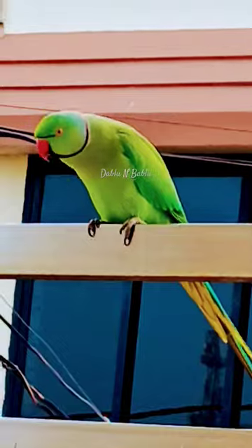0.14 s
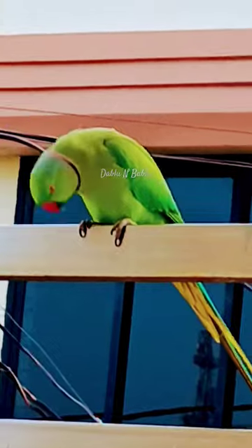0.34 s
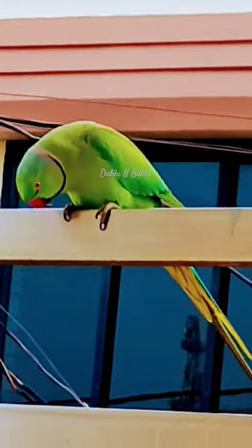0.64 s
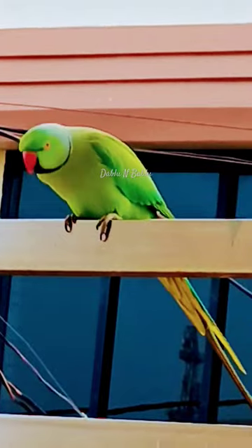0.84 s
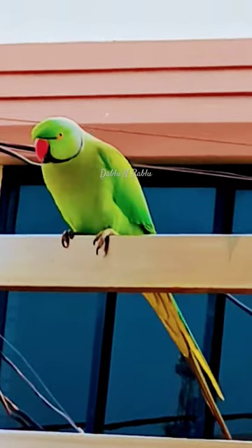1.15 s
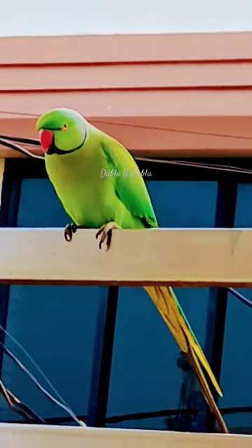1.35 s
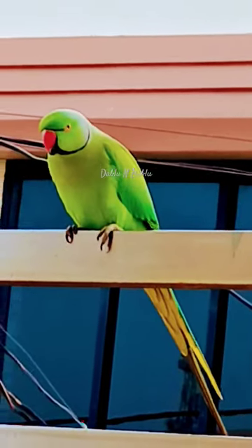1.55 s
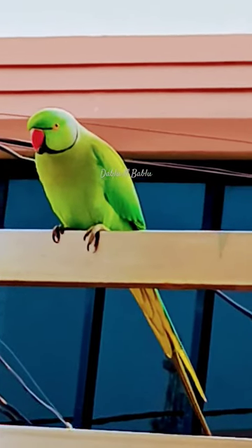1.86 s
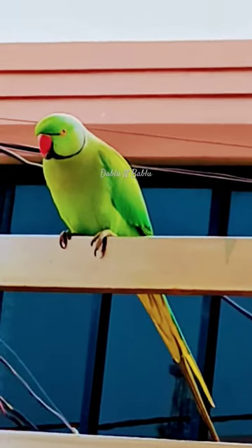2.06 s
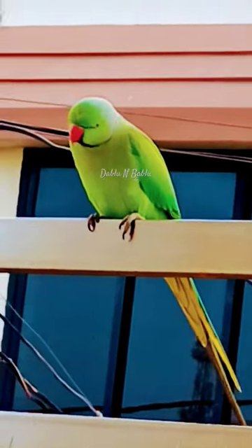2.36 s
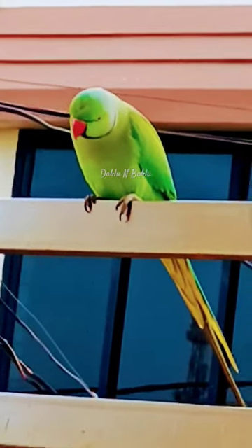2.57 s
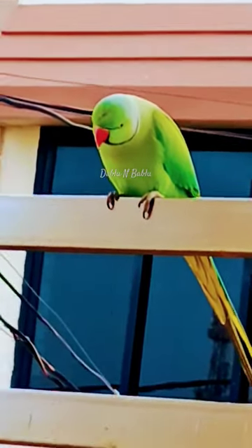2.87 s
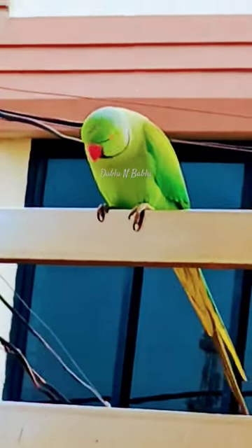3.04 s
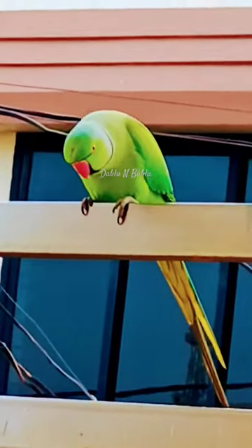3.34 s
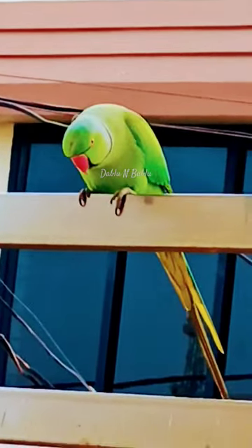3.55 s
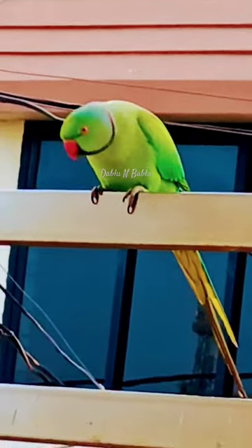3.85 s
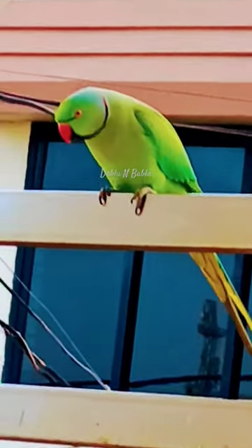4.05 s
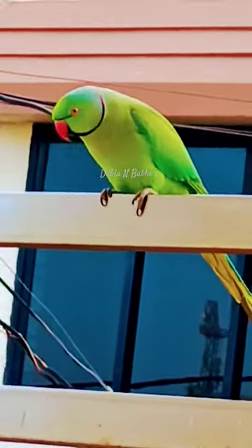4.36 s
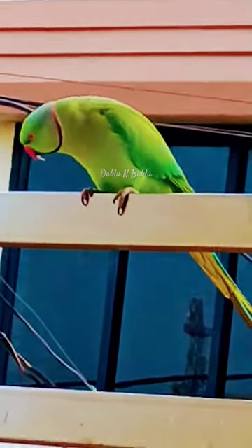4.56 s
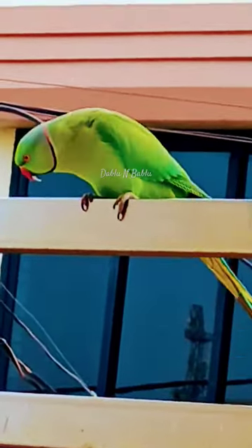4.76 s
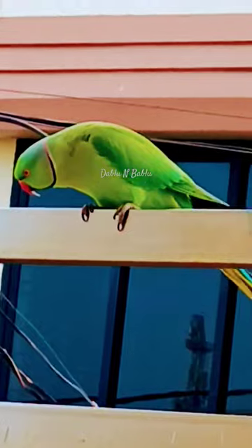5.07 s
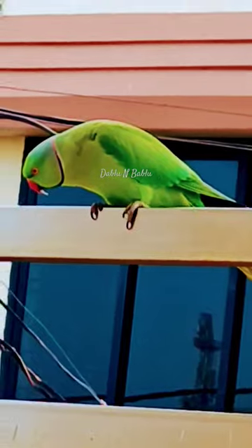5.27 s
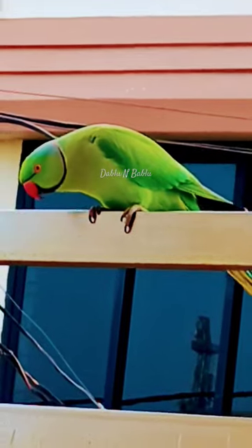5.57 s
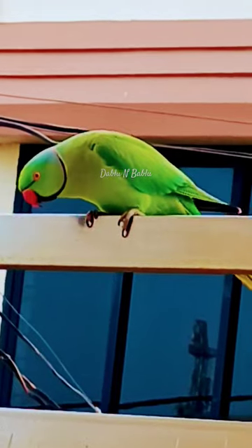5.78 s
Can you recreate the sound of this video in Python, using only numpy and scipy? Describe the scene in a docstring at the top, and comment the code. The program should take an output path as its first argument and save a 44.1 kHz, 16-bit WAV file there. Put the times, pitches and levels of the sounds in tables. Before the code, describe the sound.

A steady low rumble of distant traffic and motors fills a town courtyard. At about 0.5 seconds a parakeet in the foreground gives a loud, high falling whistle that runs into two short squawks, and another quick pair follows just after 1 second. Each squawk starts raspy, slides down in pitch and breaks up, with a brief echo off nearby walls. From 1.4 to 3.1 seconds there are only faint scrapes of beak and feet over the traffic, with three soft, far horn toots around 1.8 to 2.3 seconds. Between 3.2 and 4.4 seconds the bird gives four more shrill, hoarse squawks, most opened by a tiny croak, with quiet mutters between them. From about 4.7 seconds it only grumbles, in soft, short nasal notes with a few light scratches, the last note coming near 5.8 seconds.

```python
"""A town courtyard: a ring-necked parakeet on a ledge squawks in bunches, then grumbles more softly.
Membranes in its syrinx make the calls; its throat favours 3-4 kHz. Each squawk climbs as a rasp,
locks into a falling harmonic tone and breaks up again; croaks and whistles open some.
Beak and feet scratch, nearby walls answer, and far traffic, motors and horns sound underneath."""
import sys
import numpy as np
from scipy import signal
from scipy.fft import rfft, irfft
from scipy.io import wavfile
from scipy.ndimage import uniform_filter1d, map_coordinates

SR = 44100
rng = np.random.default_rng(int(sys.argv[2]) if len(sys.argv) > 2 else 0)


def inscribe(sig):
    """Save sig as 16-bit PCM at rate SR to the path in sys.argv[1].

    A 1-D sig is mono; a 2-D sig holds one channel per row.
    Samples are clipped to [-1, 1] before scaling.
    """
    pcm = np.round(np.clip(np.atleast_2d(sig).T, -1, 1) * 32767)
    wavfile.write(sys.argv[1], SR, pcm.astype(np.int16))


N = 260631
TIME = np.arange(N) / SR
FREQS = np.fft.rfftfreq(N, 1 / SR)

# Loud calls. Each row: tone start, lead-in and fall in seconds, top pitch in Hz, level in dB,
# roughness 0-1, brightness in dB per octave, half-harmonic gain in dB.
SQUAWKS = [ (0.604, 0.0038, 0.085, 2084, -12.5, 0.12, -1, 0),
           (.705, 0.018, 0.043, 1720, -21.5, 0.48, 3, -9), (1.043, .046, 0.099, 2188, -14, 0.12, -1, -6.5),
           (1.150, 0.027, 0.074, 2015, -16.5, 0.13, 3.5, -18),
           (3.329, 0.006, .066, 2163, -16, 0.39, 4, -15.5), (3.738, .05, .074, 2187, -16, .22, 2, -9),
           (4.020, 0.047, 0.08, 2145, -16.5, .24, 0.1, -2),
           (4.304, 0.052, 0.067, 2103, -15.5, 0.02, 2, -0.5), ]
# Upper-register notes. Each row: start and length in seconds, pitch and fall in Hz,
# level and level change in dB, brightness in dB per octave, shrillness in dB.
WHISTLES = [(.533, .069, 3350, 557, -10, -10, -8.5, 24), (3.294, .034, 2505, 50, -18.5, 1, 6, 5)]
# Call openers. Each row: start and length in seconds, pitch in Hz, level in dB,
# brightness in dB per octave.
CROAKS = [(0.501, 0.018, 1744, -24.5, -2.5), (3.264, 0.014, 1878, -19, 1.5),
          (3.699, 0.024, 1892, -25.5, -2), (3.987, 0.013, 1720, -28, 0.5)]
# Soft nasal notes. Each row: start and length in seconds, start, middle and end pitch in Hz,
# level in dB, roughness 0-1, brightness in dB per octave.
GRUMBLES = [ (3.239, .085, 1431, 1814, 1760, -28.5, .5, 4.5),
            (3.472, 0.049, 1123, 1400, 1440, -44.5, 0.74, -19),
            (3.551, 0.049, 951, 1052, 1100, -42, 0.55, -24),
            (3.559, 0.069, 1940, 1713, 1570, -35, 0.54, -7),
            (3.658, .06, 1736, 1734, 1623, -32.5, 0.6, -6.5), (3.69, 0.052, 950, 1080, 1130, -44, 0.7, -15),
            (4.086, .13, 1644, 1937, 1899, -28, 0.15, -2), (4.67, 0.064, 1190, 1323, 1390, -39, 0.4, -7),
            (4.737, 0.059, 1952, 2038, 1950, -33, 0.21, -21),
            (4.774, 0.051, 1880, 1818, 1733, -28, 0.3, -30), (4.815, 0.043, 1708, 1863, 2000, -45, 1, -11),
            (5.259, .075, 1436, 1500, 1440, -33.5, 0.22, -5),
            (5.315, 0.12, 1367, 1432, 1223, -31.5, 0.23, 0),
            (5.426, 0.069, 1235, 1178, 1154, -36, 0.22, -10),
            (5.816, 0.17, 1392, 1420, 1436, -28.5, 0.22, -0.5), ]
# Response of throat and open beak. Each row: frequency in Hz, gain in dB.
THROAT = [(700, -39), (1350, -13.5), (1900, -11), (2400, -4.5), (3000, -1), (4150, 2), (4600, -9),
          (5000, -3.5), (5600, -6), (6500, -17), (8000, -16.5), (10500, -32), (12500, -37), (15000, -32),
          (16000, -41)]
# Beak and foot scrapes. Each row: start in seconds, level in dB, decay time in seconds.
SCRATCHES = [(1.375, -46, 0.018), (2.304, -43.5, 0.012), (2.423, -44, 0.0596), (2.557, -50, .012),
             (2.707, -52, .03), (3.065, -50, .02), (3.103, -51, .04), (4.859, -46, 0.034),
             (5.21, -46.5, 0.035), (5.588, -46, .015)]
# Scrape spectrum. Each row: frequency in Hz, gain in dB.
SCRATCH_SPECTRUM = [(1500, -37.5), (4000, 7), (6300, 7.5), (8000, 7.5), (12000, -13), (15500, -2)]
# Reflections off ledge and house front. Each row: delay in milliseconds, gain in dB.
WALL_ECHOES = [(4.7, -15), (6.1, -13), (8.3, -15), (17.8, -18), (23, -18)]
# Far horns. Each row: start and length in seconds, pitch in Hz, level in dB.
HORNS = [(1.802, 0.062, 510, -38), (1.915, 0.059, 610, -38.5), (2.197, 0.15, 612, -40.5)]
# Far traffic spectrum. Each row: frequency in Hz, gain in dB.
TRAFFIC_SPECTRUM = [(25, -28), (48, -24), (76, -1), (115, 1), (165, -4), (230, 3.5), (380, 3.5), (700, -5),
                    (1200, -10.5), (2000, -13), (4300, -24), (7000, -23.5), (9000, -34.5), (15500, -44.5)]
# Far motor tones. Each row: frequency in Hz, rms level in dB.
MOTORS = [(114, -53.5), (309, -53.5)]
# Subdued treble bands. Each row: low and high edge in Hz, gain in dB.
TREBLE_DIPS = [(4815, 6130, -9.5), (8615, 11608, -15)]


def squawk(start_s, lead_s, fall_s, top_hz, db, rough, bright, half_db, break_hz=1390, overshoot_hz=78):
    """A hoarse climb, a loud tone sliding down to the breaking pitch, a ragged end."""
    lock_s, release_s = 0.0035, 0.02
    t = np.linspace(start_s - lead_s, start_s + fall_s + release_s, 200)
    climb_hz = np.interp(t, [t[0], start_s - lead_s * .3, start_s],
                         [break_hz, top_hz + overshoot_hz, top_hz])
    slide_hz = (top_hz - break_hz) * np.maximum((t - start_s) / fall_s, 0) ** 1.12
    stages_s = np.maximum.accumulate([
        t[0], start_s - lead_s / 2, start_s - lock_s,  # lead-in
        start_s, start_s + fall_s * .72, start_s + fall_s, t[-1]])  # lock, fray, break, end
    effort_db = np.interp(t, stages_s, [-15.5, -8, -8, 0, -2, -14, -18.5])
    roughness = np.interp(t, stages_s, [.5, .28, .28, rough, rough, .31, .47])
    return syrinx(t, climb_hz - slide_hz, db + effort_db, roughness, bright, half_db=half_db)


def whistle(start_s, length_s, hz, fall_hz, db, change_db, bright, shrill_db, attack_s=0.0091):
    """A clear high note, thin or bright with overtones, that slips down, quickly at first."""
    age_s = np.linspace(0, length_s, 50)
    effort_db = np.interp(age_s, [0, attack_s, length_s], [-12, 0, change_db])
    pitch_hz = hz - fall_hz * (age_s / length_s) ** 0.62
    return syrinx(start_s + age_s, pitch_hz, db + effort_db, 0.1, bright, shrill_db=shrill_db)


def croak(start_s, length_s, hz, db, bright, attack_s=0.00627):
    """A brief burst of chaotic vibration."""
    t = start_s + np.array([0, attack_s, length_s])
    return syrinx(t, hz, db + np.array([-12, 0, -6]), rough=0.7, bright=bright, flutter_db=3.5)


def grumble(start_s, length_s, start_hz, mid_hz, end_hz, db, rough, bright,
            attack_s=0.02, release_s=0.021):
    """A soft nasal note on a pitch curve, odd harmonics favoured, hoarser as it swells and fades."""
    age_s = np.linspace(0, length_s, 50)
    parabola = np.polyfit([0, length_s / 2, length_s], [start_hz, mid_hz, end_hz], 2)
    edge = 1 - np.minimum(np.minimum(age_s / attack_s, (length_s - age_s) / release_s), 1)
    husk = undb(-10) * (mid_hz < 1650)  # only low, slack notes leak air
    return syrinx(start_s + age_s, np.polyval(parabola, age_s), db - 9.5 * edge, rough + 0.24 * edge,
                  bright, odd_db=1.6, husk=husk)


def syrinx(times_s, hz, db, rough, bright, jitter=0.046, flutter_db=6, rasp_db=-3, half_db=-9,
           odd_db=-2, shrill_db=0, husk=0, husk_hz=2200):
    """Vibrating membranes, more chaotic with roughness, heard through the throat; controls at times_s."""
    span = (TIME > times_s[0] - .003) & (TIME < times_s[-1] + .01)
    t = TIME[span]
    hz, db, rough = (np.interp(t, times_s, np.broadcast_to(c, len(times_s))) for c in (hz, db, rough))
    rough, size = np.clip(rough, 0, 1), len(t)
    stagger = .036 * np.sqrt(rough) * wobble(85, size)
    hz = hz * (1 + jitter * rough * wobble(500, size) + stagger)
    phase = 2 * np.pi * np.cumsum(hz) / SR
    voice, power = np.zeros(size), np.zeros(size)
    for k in np.arange(1, 21) / 2:  # uneven alternate cycles add half-harmonics
        colour_db = bright * np.log2(max(k, 1)) + odd_db * (k % 2 == 1)
        gain = throat(k * hz, db, shrill_db) * undb(colour_db) * (k * hz < SR / 2)
        chaos = 1 - (1 - rough) ** max(1, k - 1.5)  # high overtones break up first
        line = 1 - chaos ** 2 if k % 1 == 0 else undb(half_db) * chaos
        rasp = undb(rasp_db) * (chaos if k % 1 == 0 else chaos ** 2)
        skirt = wobble(299.9, size) * np.sin(k * phase) + wobble(296.1, size) * np.cos(k * phase)
        ragged = undb(min(k + 1, 4) * wobble(80, size))  # membranes close unevenly
        tone = np.sin(k * phase + rng.uniform(0, 2 * np.pi))
        voice += gain * ragged * (line * tone + rasp * skirt)
        power += gain ** 2 * (line ** 2 / 2 + rasp ** 2)
    voice /= np.sqrt(uniform_filter1d(power, size=200))
    air = wobble(620, size) * np.sqrt(2) * np.sin(2 * np.pi * husk_hz * t)
    gate = np.interp(t, [t[0], times_s[0], times_s[-1], t[-1]], [0, 1, 1, 0])
    level = undb(db + flutter_db * rough * wobble(252.2, size))
    out = np.zeros(N)
    out[span] = (voice + husk * air) * gate * level
    return out


def throat(hz, effort_db, shrill_db, closed_hz=6900, open_hz=8100, boom_hz=1310):
    """Throat gain: as the beak opens for loud notes, its resonance climbs and a low boom fades."""
    opening = np.interp(effort_db, [-26, -18], [0, 1])
    beak_hz = closed_hz + (open_hz - closed_hz) * opening
    beak_db = 10 / (1 + ((hz - beak_hz) / 600) ** 2)
    boom_db = (1 - opening) * 6 / (1 + ((hz - boom_hz) / 1060) ** 2)
    top_db = np.interp(hz, [8100, 12000], [0, shrill_db])
    return gain_at(hz, THROAT) * undb(beak_db + boom_db + top_db)


def scratches(attack_s=0.0024, grain_db=4):
    """Beak and feet: short grainy scrapes."""
    envelope = np.zeros(N)
    for start_s, db, decay_s in SCRATCHES:
        age_s = np.maximum(TIME - start_s, 0)
        envelope += undb(db) * np.minimum(age_s / attack_s, 1) * np.exp(-(age_s / decay_s) ** 2)
    return envelope * unit(noise(SCRATCH_SPECTRUM) * undb(grain_db * wobble(300, N)))


def courtyard(x, t60_s=0.46, treble_t60_s=0.26, split_hz=6000, tail_db=-7, direct_db=-2):
    """Direct sound, near reflections and a diffuse tail whose treble dies first."""
    t = TIME[:SR]
    tail = np.zeros(SR)
    for band, decay_s in (("low", t60_s), ("high", treble_t60_s)):
        sos = signal.butter(2, split_hz, band, fs=SR, output="sos")
        tail += signal.sosfilt(sos, rng.standard_normal(SR)) * undb(-60 * t / decay_s)
    tail *= np.minimum(t / 0.00133, 1)
    response = undb(tail_db) * tail / np.sqrt(np.sum(tail ** 2))
    response[0] += undb(direct_db)
    for delay_ms, db in WALL_ECHOES:
        response[int(delay_ms * SR / 1000)] += undb(db)
    return signal.fftconvolve(x, response)[:N]


def horns():
    """Brief toots, so distant that one soft tone is left of each."""
    out = np.zeros(N)
    for start_s, length_s, hz, db in HORNS:
        envelope = np.sin(np.pi * np.clip((TIME - start_s) / length_s, 0, 1))
        out += undb(db) * np.sqrt(2) * envelope * np.sin(2 * np.pi * hz * TIME)
    return out


def town(traffic_db=-37, swell_db=0.44, flicker_db=1.07, waver_hz=4):
    """Far traffic that swells gently, with wavering motor tones."""
    murk = noise(TRAFFIC_SPECTRUM)
    rumble = signal.sosfiltfilt(signal.butter(2, 900, fs=SR, output="sos"), murk)
    traffic = rumble * undb(flicker_db * wobble(7, N)) + murk - rumble
    hum = np.zeros(N)
    for hz, db in MOTORS:
        phase = 2 * np.pi * np.cumsum(hz + waver_hz * wobble(6, N)) / SR
        hum += undb(db) * unit(np.sin(phase))
    return traffic * undb(traffic_db + swell_db * wobble(0.718, N)) + hum


def undb(db):
    """Decibels to gain."""
    return 10 ** (np.asarray(db) / 20)


def unit(x):
    """Scale to rms 1."""
    return x / np.sqrt(np.mean(x ** 2))


def gain_at(hz, spectrum):
    """Gain of a (Hz, dB) spectrum, interpolated in log frequency."""
    knots_hz, db = np.transpose(spectrum)
    return undb(np.interp(np.log(np.maximum(hz, 1)), np.log(knots_hz), db))


def noise(spectrum):
    """Shaped noise of rms 1."""
    return unit(irfft(rfft(rng.standard_normal(N)) * gain_at(FREQS, spectrum), N))


def wobble(rate_hz, size):
    """Smooth random motion up to rate_hz, spread about 1."""
    step = SR / rate_hz / 2
    knots = rng.standard_normal(int(size / step) + 4)
    return map_coordinates(knots, [np.arange(size) / step + 1], order=3, mode="nearest")


def scene():
    """Calls and scratches among the walls, over the town."""
    calls = [(squawk, SQUAWKS), (whistle, WHISTLES), (croak, CROAKS), (grumble, GRUMBLES)]
    bird = sum(call(*row) for call, rows in calls for row in rows) + scratches()
    return (courtyard(bird) + town() + horns())[None]


def record(dry, silence_s=0.133, fade_s=0.0089, top_hz=15500):
    """Two treble dips, a quick fade-in after silence, a steep low-pass."""
    dips_db = sum(db * np.interp(FREQS, [lo - 80, lo + 80, hi - 80, hi + 80], [0, 1, 1, 0])
                  for lo, hi, db in TREBLE_DIPS)
    coloured = irfft(rfft(dry) * undb(dips_db), N)
    fade_in = np.clip((TIME - silence_s) / fade_s, 0, 1)
    return signal.sosfilt(signal.ellip(10, .2, 80, top_hz, fs=SR, output="sos"), coloured * fade_in)


dry = scene()
out = record(dry)
inscribe(out)
```